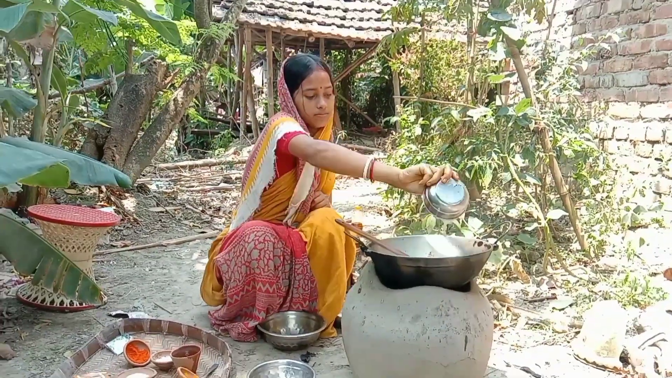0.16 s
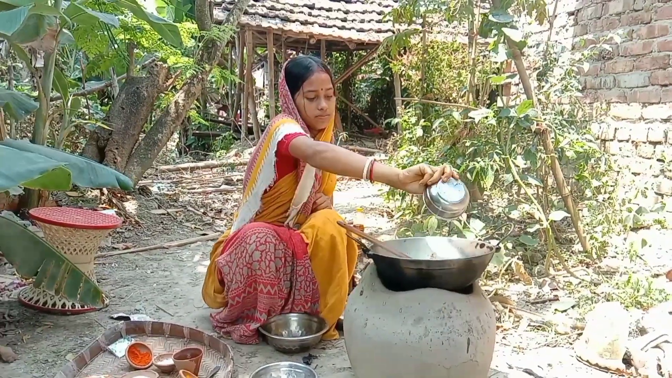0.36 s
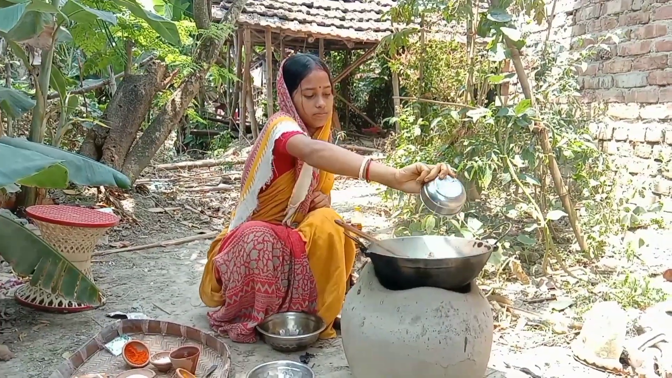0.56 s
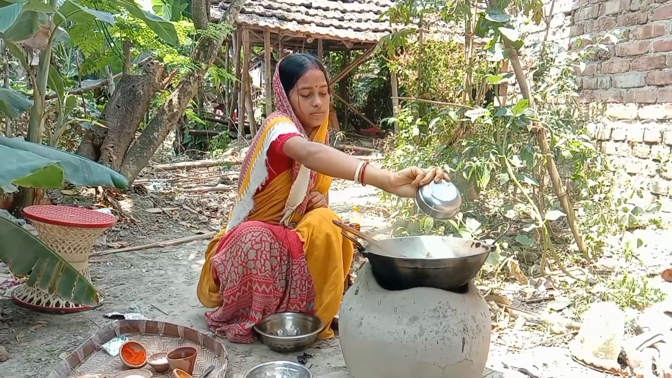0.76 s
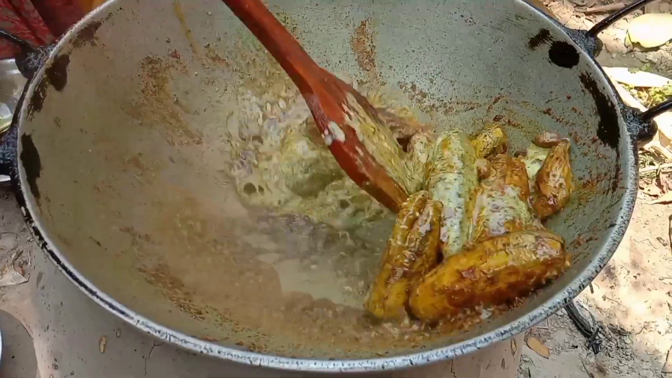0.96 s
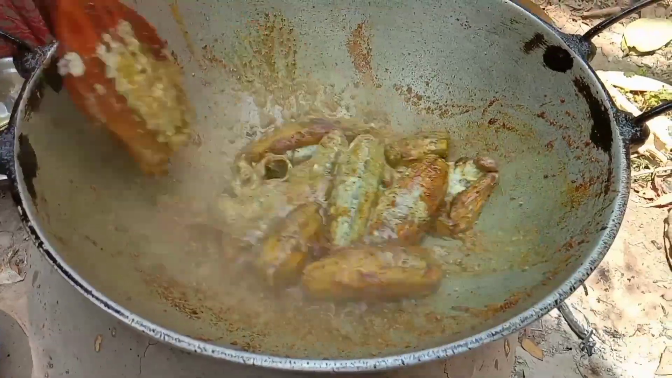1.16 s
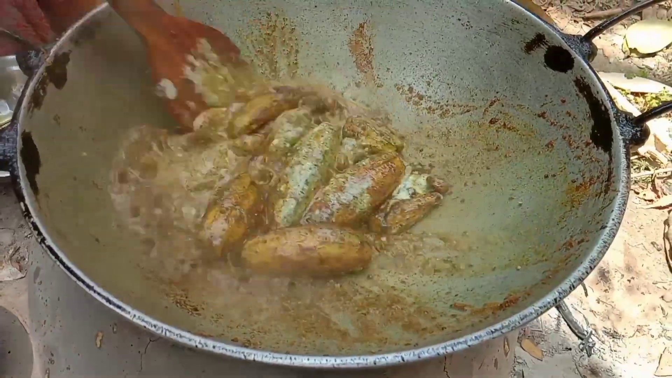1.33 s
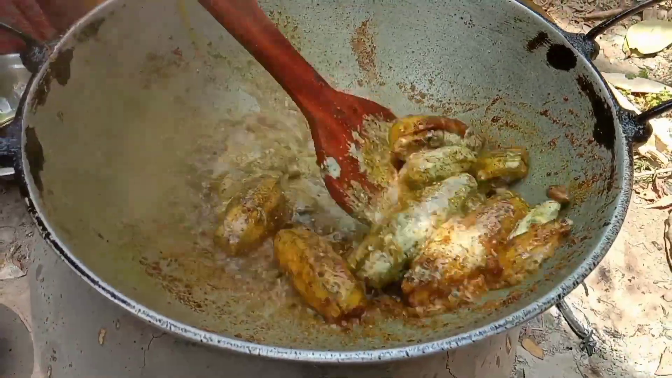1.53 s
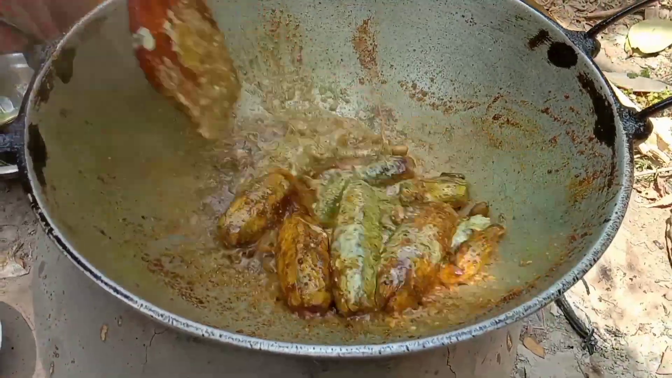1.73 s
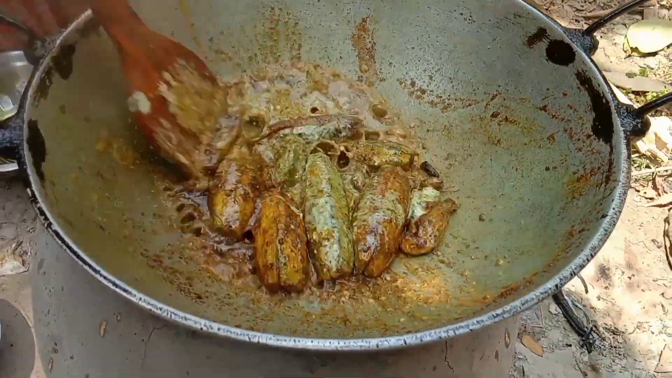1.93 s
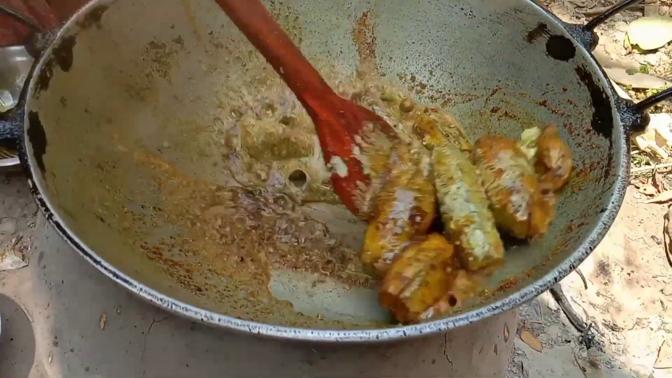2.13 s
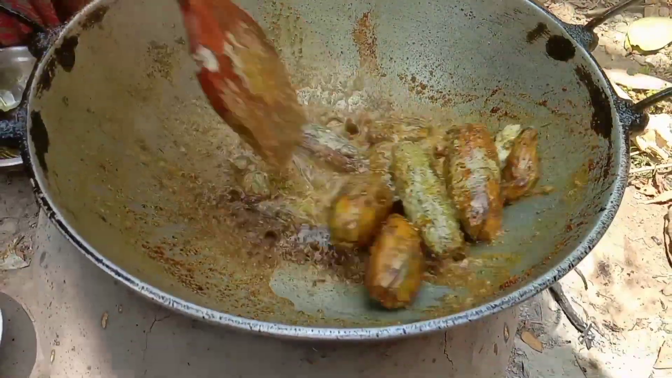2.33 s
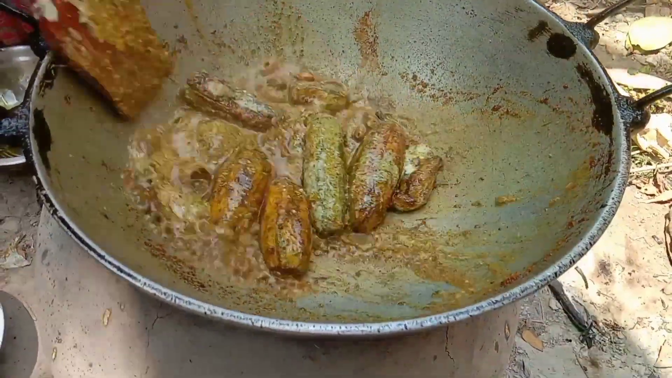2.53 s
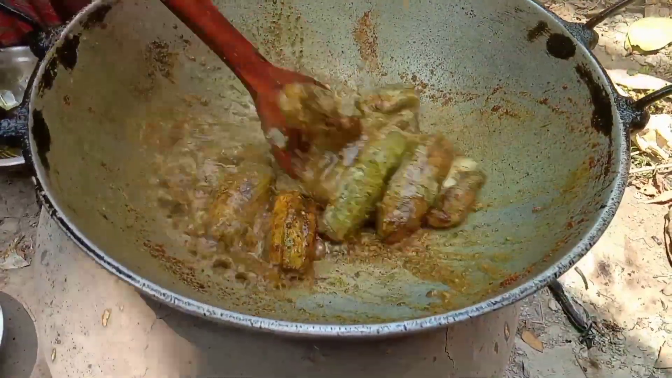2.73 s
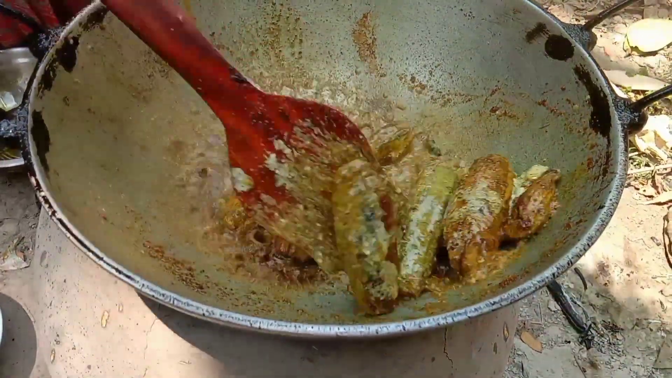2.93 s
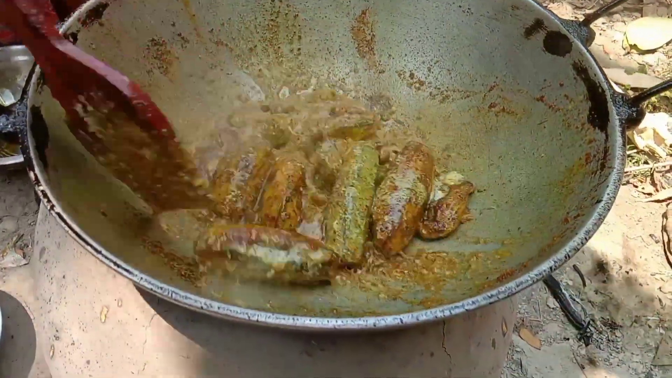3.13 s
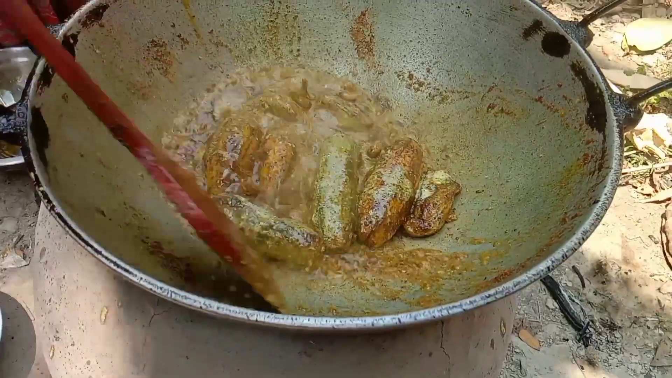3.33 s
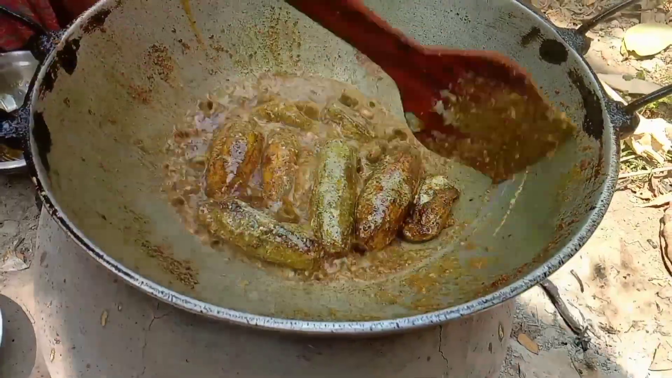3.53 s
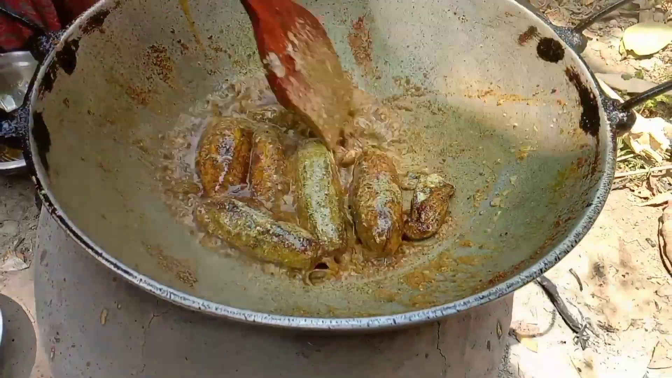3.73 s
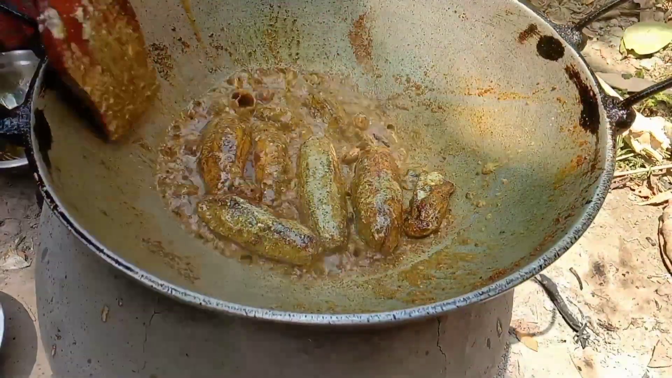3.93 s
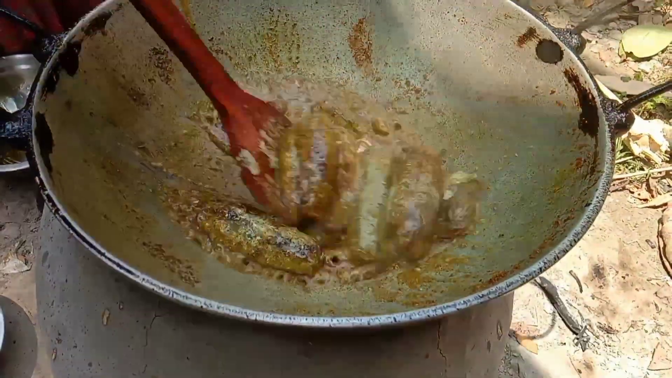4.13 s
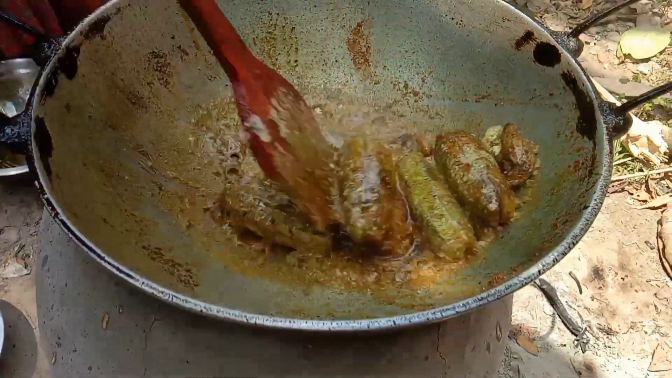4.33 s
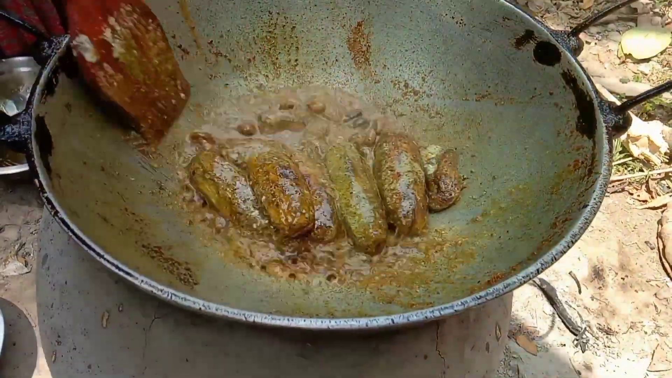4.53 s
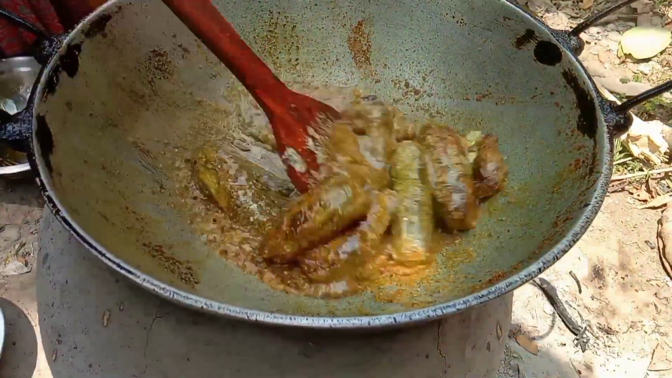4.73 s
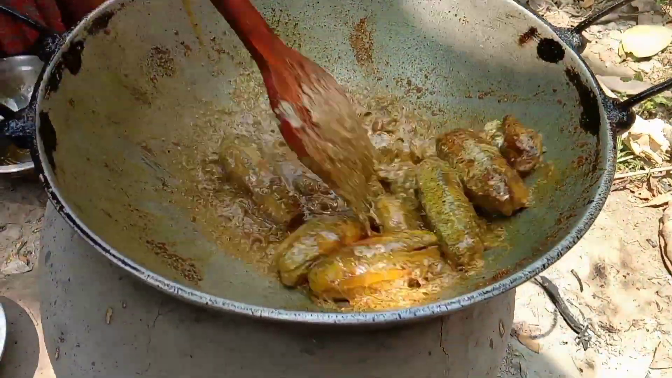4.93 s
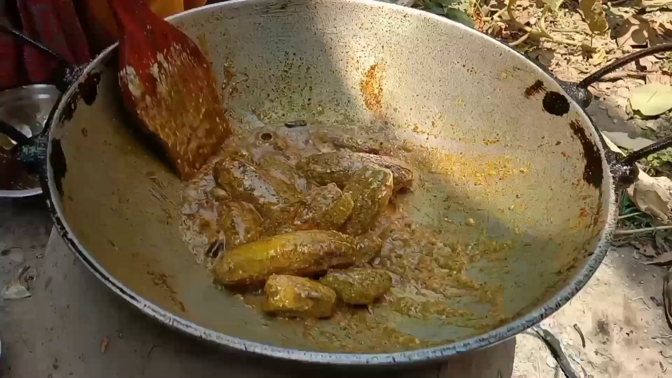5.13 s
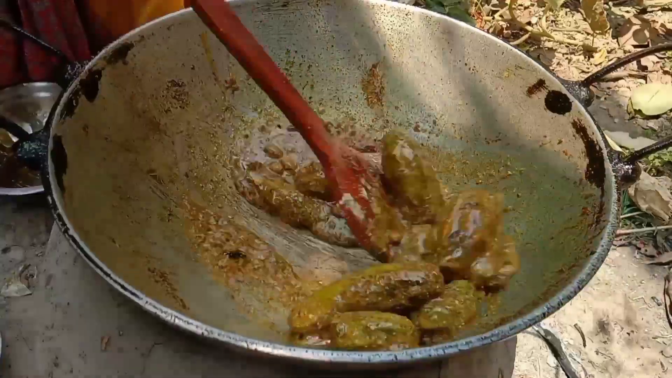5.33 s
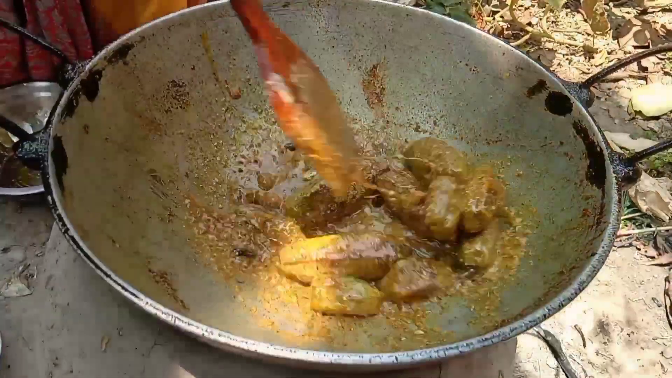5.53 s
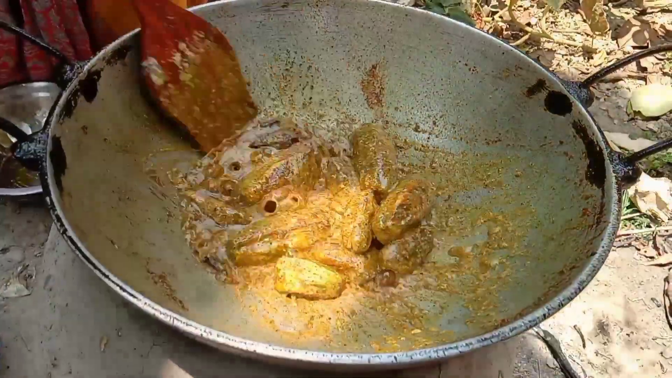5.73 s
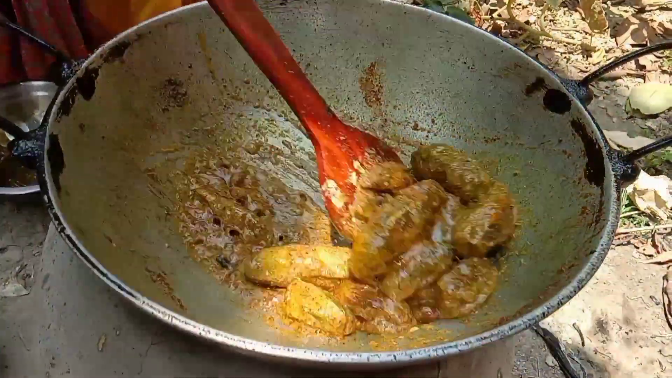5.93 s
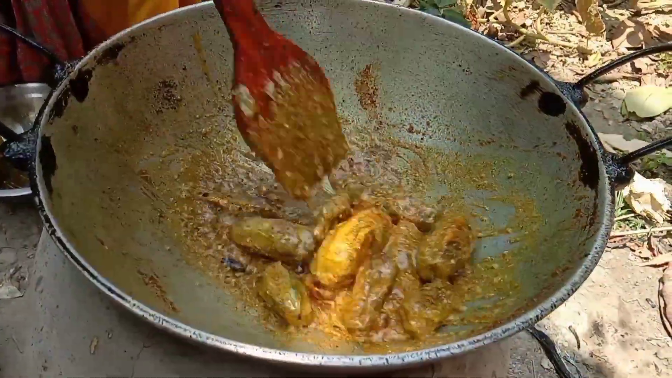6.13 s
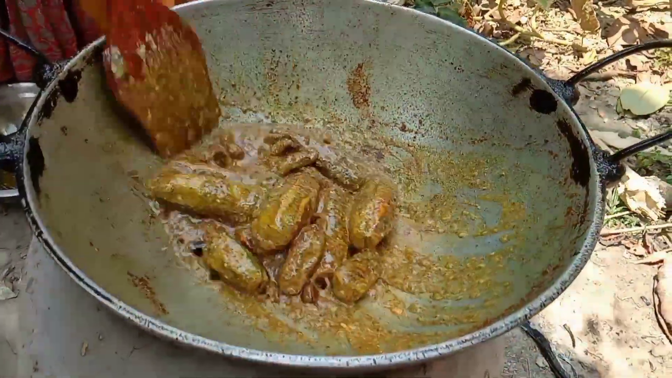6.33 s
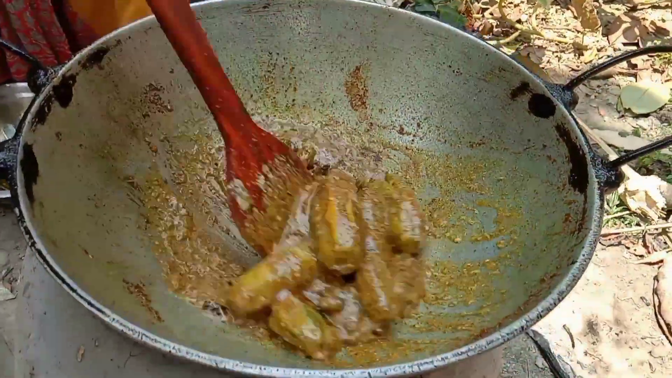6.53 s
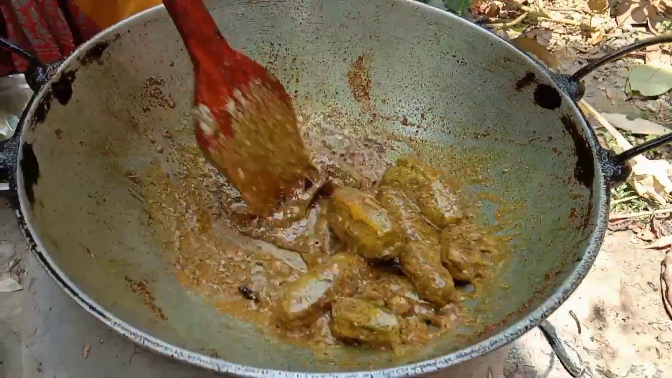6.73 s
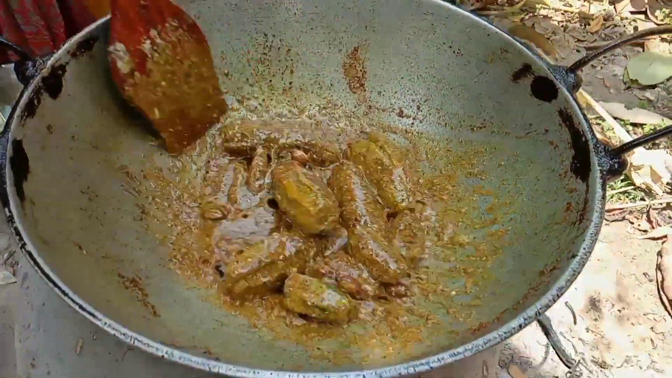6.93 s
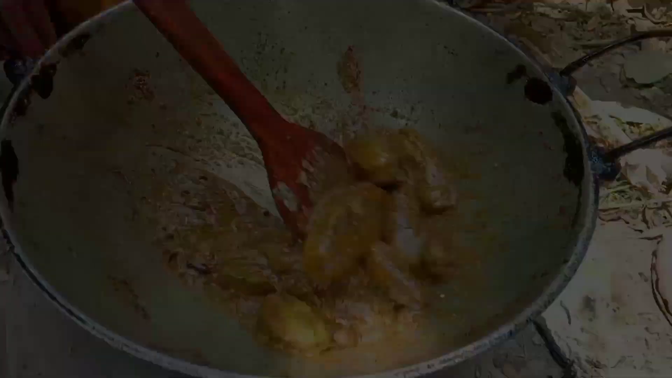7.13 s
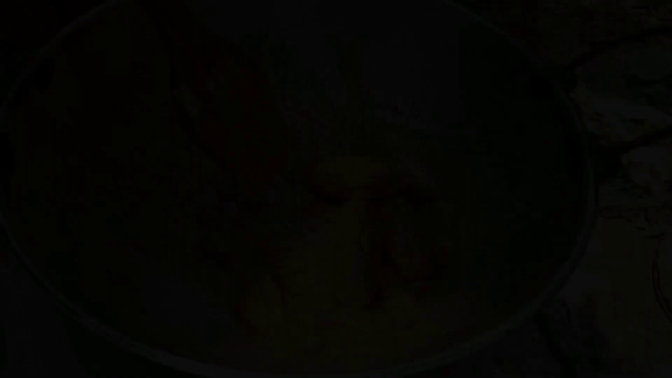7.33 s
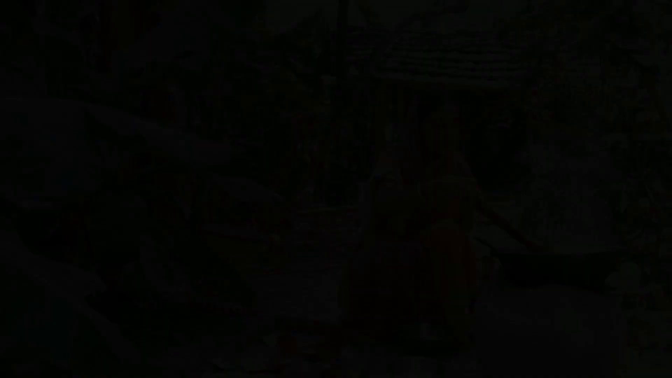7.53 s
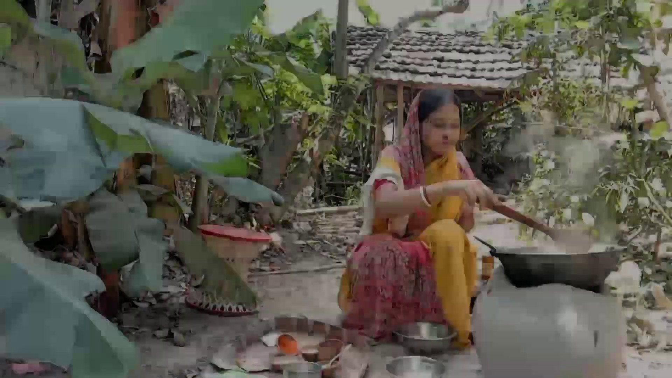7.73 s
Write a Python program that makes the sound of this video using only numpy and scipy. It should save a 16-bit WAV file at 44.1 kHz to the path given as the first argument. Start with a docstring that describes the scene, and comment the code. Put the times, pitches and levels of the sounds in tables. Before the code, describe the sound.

Wet paste sizzles loudly in hot oil in a wok, then slowly dies down while a wooden spatula knocks and scrapes.

```python
"""Wet paste fried in an iron wok on a clay stove outdoors, mono. Over the quiet oil a hollow call rises.
At 0.18 s the paste hits the oil: steam bubbles burst in a dense sizzle, heard from afar, with a low hum,
wind and two squeaks. From 1.1 s the sizzle is close by; it turns hollower and dies away over a simmer
while a wooden spatula knocks and scrapes. Oil pops three times around 6 s. At the end the hum swells
again and more squeaks sound."""
import sys
import numpy as np
from scipy import signal
from scipy.fft import rfft, irfft, next_fast_len
from scipy.io import wavfile
from scipy.ndimage import uniform_filter1d, map_coordinates

SR = 44100
rng = np.random.default_rng(int(sys.argv[2]) if len(sys.argv) > 2 else 0)


def persist_wave(psi):
    """Save psi, clipped to +-1, as 16-bit WAV."""
    counts = np.round(np.clip(psi, -1, 1) * 32767).astype(np.int16)
    wavfile.write(sys.argv[1], SR, np.atleast_2d(counts).T)


N = 342808
TIME_S = np.arange(N) / SR
POUR_S, BOIL_END_S = 0.176, 1.12


def amp(db):
    """dB to gain."""
    return 10 ** (np.asarray(db) / 20)


def unit(x):
    """x at rms 1."""
    return x / np.sqrt(np.mean(x ** 2) + 1e-20)


def curves(rows):
    """Per-sample curve of each column after the time."""
    times_s, *columns = np.transpose(rows)
    return [np.interp(TIME_S, times_s, column) for column in columns]


def wobble(rate_hz):
    """Smooth random curve, rate_hz knots a second."""
    knots = rng.standard_normal(int(N * rate_hz / SR) + 4)
    return map_coordinates(knots, [TIME_S * rate_hz])


def filtered(x, response):
    """x through a complex frequency response."""
    size = next_fast_len(N + SR // 4)
    return irfft(rfft(x, size) * response(np.fft.rfftfreq(size, 1 / SR)), size)[..., :N]


def causal(points):
    """Minimum-phase response through (frequency [Hz], gain [dB]): each pop rings after it bursts."""
    points_hz, points_db = np.transpose(points)

    def response(hz):
        db = np.interp(np.log(hz + 1), np.log(points_hz + 1), points_db)
        cepstrum = irfft(np.log(amp(np.maximum(db, -80))))
        cepstrum[1:len(hz) - 1] *= 2
        cepstrum[len(hz):] = 0
        return np.exp(rfft(cepstrum))
    return response


def resonance(hz, centre_hz, width_hz):
    """Response of one mode, 1 at its centre."""
    return 1j * hz * width_hz / (centre_hz ** 2 - hz ** 2 + 1j * hz * width_hz)


def spiky_noise(count, spread_db):
    """Noise with a random gain on each sample."""
    return rng.standard_normal(count) * amp(spread_db * np.clip(rng.standard_normal(count), -3, 3))


def bursts(response, spread_db, patchy_db, streak_db):
    """Countless bursting bubbles, rms 1: broad patches where oil spits, streaks where a pitch lingers."""
    x = spiky_noise(N, spread_db)
    for depth_db, window, bins, frames in ((patchy_db, 256, 5, 8), (streak_db, 1024, 2, 6)):
        spectra = signal.stft(x, nperseg=window)[2]
        field = uniform_filter1d(rng.standard_normal(spectra.shape), size=bins, axis=0)
        field = uniform_filter1d(field, size=frames, axis=1)
        x = signal.istft(spectra * amp(depth_db * unit(field)), nperseg=window)[1][:N]
    return unit(filtered(x, response))


def tone(hz, db, overtones, rough):
    """Gliding sine with overtones (multiple, gain [dB]), hoarse from amplitude and phase flutter."""
    phase = 2 * np.pi * np.cumsum(hz) / SR + rough * wobble(120)
    stack = np.sin(phase) + sum(amp(gain_db) * np.sin(k * phase) for k, gain_db in overtones)
    return np.sqrt(2) * amp(db) * (1 + 0.58 * rough * wobble(140)) * stack


def fry():
    """Close sizzle, swelling as the pieces are turned; spray, wok ring and wood rub follow its level."""
    # close sizzle (time [s], level [dB], finest spray re sizzle [dB])
    levels = [(1.17, -31, -9), (1.28, -32, -4), (1.46, -29, -6.5), (1.96, -28, -5), (2.05, -29.5, -8),
              (2.29, -29.5, -5), (2.55, -34, -6), (2.69, -34, -4), (2.79, -31, -6), (3.03, -32.5, -1),
              (3.23, -34.5, -5), (3.37, -33, -1), (4.02, -36, -4), (5.1, -37.5, -4), (5.36, -42, -6),
              (5.82, -43, -3), (5.93, -40.5, -7), (6.33, -43, -7), (7.05, -42, -3), (7.18, -45.5, -7),
              (7.77, -53, -8)]
    # sizzle spectra, oil spitting high and sunk into the bowl (frequency [Hz], density [dB])
    high_colour = [(1650, -36), (2800, -3.5), (3000, -5.5), (3870, 2.5), (4640, -3), (5380, 2),
                   (6200, -2.5), (7140, 2), (8060, -5.5), (8980, -3.5), (12600, -14), (13400, -14),
                   (14000, -15)]
    sunk_colour = [(1650, -28), (2800, -3.5), (3060, -6.5), (3890, 3.5), (4610, -10.5), (5030, -1),
                   (5490, 3), (6320, -3), (7330, 2), (7950, -5), (8860, -3), (11200, -12), (12400, -13),
                   (13400, -24), (14000, -35)]
    # sinking into the bowl (time [s], power share of the sunk colour [0-1])
    sinking = [(1.5, 0), (6, 1)]
    # spray at the microphone port's peak (frequency [Hz], density [dB])
    spray_colour = [(13300, -8.5), (14000, 6), (14600, 18), (15200, 21), (15600, 7.5)]
    # strongest wok modes (frequency [Hz], width [Hz], gain [dB])
    modes = [(613.4, 37, -15.5), (978, 68, -16.5), (1269, 103, 3), (1723, 250, -7.5)]
    # wood on iron (frequency [Hz], density [dB])
    rub_colour = [(820, -36), (1400, -3.5), (1500, -5.5), (1710, 0), (2010, -3.5), (2190, -1.5), (2980, -6),
                  (3200, -3.5), (4160, -20), (7040, -120)]

    def wok(hz):
        return sum(amp(db) * resonance(hz, centre, width) ** 2 for centre, width, db in modes)

    level_db, spray_db = curves(levels)
    sunk_share, = curves(sinking)
    change_db = level_db + 30  # re the loud sizzle at -30 dB
    flicker = wobble(30)
    high = bursts(causal(high_colour), spread_db=5, patchy_db=1, streak_db=1.46)
    sunk = bursts(causal(sunk_colour), spread_db=5, patchy_db=1, streak_db=1.46)
    sizzle = amp(level_db + 0.6 * flicker) * (np.sqrt(1 - sunk_share) * high + np.sqrt(sunk_share) * sunk)
    spray = amp(level_db + spray_db + 0.8 * flicker + 0.74 * wobble(45))
    spray *= bursts(causal(spray_colour), spread_db=6, patchy_db=1, streak_db=-1)
    ring = amp(-36.5 + 0.85 * change_db) * bursts(wok, spread_db=0, patchy_db=-1.2, streak_db=2)
    rub = amp(-35.5 + 1.086 * change_db + 0.7 * flicker + 0.51 * wobble(5))
    rub *= bursts(causal(rub_colour), spread_db=4, patchy_db=1.1, streak_db=3)
    return sizzle + spray + ring + rub


def boil_up():
    """The water in the paste boils off at once and rings the wok, heard from afar."""
    # far hiss (frequency [Hz], density [dB])
    colour = [(88, -77), (150, -24), (359, -22), (642, -15.5), (842, -13), (1260, -3), (1390, -9),
              (1510, -6.5), (2490, -1), (4810, -6), (7230, -6), (8120, -9), (10500, -7), (13400, -26.5),
              (15400, -5)]
    # wok modes and dips between them (frequency [Hz], width [Hz], gain re hiss [dB])
    modes = [(1293, 16, 7), (1524, 21, 10), (1674, 38, 8), (1988, 29, 6.5), (2505, 63, 4), (2900, 90, 1.5),
             (3053, 33, 6.5), (4430, 90, 0.5), (6220, 290, -17), (7180, 380, 3.5), (8100, 340, -8),
             (10200, 1200, -3)]

    def rung_hiss(hz):
        peaks = [1 + (amp(db) - 1) * resonance(hz, centre, width) for centre, width, db in modes]
        return causal(colour)(hz) * np.prod(peaks, axis=0)

    rise_db_per_s, fade_db_per_s = 4, 260
    level_db = -21 + rise_db_per_s * (TIME_S - POUR_S)
    level_db -= fade_db_per_s * np.maximum(TIME_S - BOIL_END_S, 0)
    envelope = (TIME_S >= POUR_S) * amp(level_db + 0.48 * wobble(23.8))
    return envelope * bursts(rung_hiss, spread_db=2.5, patchy_db=0.4, streak_db=1.97)


def knocks():
    """Spatula contacts: a dull, rough thud of the loaded wok and a short click of the iron."""
    # contacts (time [s], relative thud level [dB], thud pitch [Hz], click gain [dB])
    contacts = [(1.352, -35.5, 299, -37), (1.935, -36.5, 290, -52), (2.666, -32, 322, -51),
                (2.685, -25.5, 350, -39), (3.327, -36, 310, -42), (3.794, -43, 423, -52),
                (4.103, -36, 322, -43), (4.255, -43, 456, -53), (4.642, -43, 298, -49),
                (5.271, -39, 288, -42), (5.377, -43.5, 296, -40), (5.818, -36, 463, -31),
                (5.826, -32, 299, -37), (5.975, -36.5, 370, -43), (6.432, -38, 497, -32),
                (6.529, -43, 277, -52), (6.551, -46, 298, -51), (6.926, -40.5, 387, -54),
                (7.021, -37, 478, -30.5), (7.134, -49, 377, -42), (7.304, -41, 462, -50),
                (7.607, -37, 271, -39)]
    # iron click modes (frequency [Hz], gain [dB], t60 [s])
    modes = [(1070, -27, 0.09), (1900, 4.5, 0.014), (2540, 2.5, 0.021), (2690, -1, 0.035),
             (3680, -6, 0.016)]
    out, t = np.zeros(N + SR), np.arange(SR // 5) / SR
    puff_band = signal.butter(3, [260, 520], "band", fs=SR)
    for start_s, thud_db, thud_hz, click_db in contacts:
        puff = unit(signal.lfilter(*puff_band, rng.standard_normal(len(t))))
        thud = np.sin(2 * np.pi * thud_hz * t) * amp(-60 * t / 0.052)
        thud += 0.37 * puff * amp(-60 * t / 0.11)
        thud *= 1 - np.exp(-t / 0.005)
        click = np.zeros(len(t))
        for hz, db, t60_s in modes:
            decay = amp(db + rng.normal(0, 2.4) - 60 * t / t60_s)
            click += decay * np.sin(2 * np.pi * hz * rng.normal(1, 0.029) * t)
        click += 0.46 * np.diff(rng.standard_normal(len(t) + 1)) * amp(-60 * t / 0.0043)
        click *= 1 - np.exp(-t / 0.0003)
        out[round(start_s * SR):][:len(t)] += amp(thud_db + 5) * thud + amp(click_db) * click
    return out[:N]


def rasps():
    """Wood dragged over iron: a swell of rough noise around one resonance."""
    # rasps, mostly blade drags (start [s], length [s], centre [Hz], level [dB])
    drags = [(1.466, 0.077, 1900, -33), (2.123, 0.042, 1700, -38), (2.796, 0.13, 1670, -36.5),
             (3.316, 0.051, 950, -41), (4.248, 0.13, 1000, -50.5), (4.721, 0.066, 2200, -39.5),
             (5.063, .12, 2200, -49), (5.29, 0.048, 2580, -42), (5.838, 0.043, 2360, -46),
             (5.919, 0.093, 1750, -40), (6.428, 0.07, 1005, -47), (6.434, 0.047, 2400, -44),
             (7.044, .05, 990, -53), (7.05, 0.16, 1500, -46), (7.144, 0.067, 2020, -47),
             (7.62, 0.098, 480, -53.5), (7.675, .16, 2290, -48), (7.688, 0.078, 3280, -51),
             (7.696, 0.1, 1780, -45), (7.722, .12, 488, -49)]
    out, t = np.zeros(N + SR), np.arange(SR // 5) / SR
    for start_s, length_s, hz, db in drags:
        band = signal.butter(2, [hz * 0.932, hz * 1.084], "band", fs=SR)
        swell = np.sin(np.pi * np.clip(t / length_s, 0, 1))
        friction = unit(signal.lfilter(*band, spiky_noise(len(t), spread_db=5)))
        out[round(start_s * SR):][:len(t)] += amp(db) * swell * friction
    return out[:N]


def spits():
    """Single oil drops burst: short bright cracks."""
    # pops (time [s], impulse before the band-pass [dB])
    pops = [(5.7694, -20), (5.9424, -17), (6.5318, -11)]
    impulses = np.zeros(N)
    for start_s, db in pops:
        impulses[round(start_s * SR)] = amp(db)
    return signal.lfilter(*signal.butter(2, [1600, 9500], "band", fs=SR), impulses)


def simmer():
    """Large slow bubbles under the sizzle."""
    # bubble spectrum (frequency [Hz], density [dB])
    colour = [(76, -60), (130, -32), (194, -12), (414, -5.5), (506, -6), (602, -1.5), (736, -11), (958, -2),
              (1070, -8), (1150, -2), (1500, -45), (2530, -120)]
    # bubbling (time [s], level [dB])
    levels = [(1.15, -45.5), (2.3, -48), (2.6, -52), (4.3, -55.5), (5.1, -59), (7.2, -55.5), (7.77, -51.5)]
    envelope = amp(curves(levels)[0] + 0.69 * wobble(6))
    return envelope * bursts(causal(colour), spread_db=3.5, patchy_db=2, streak_db=4)


def squeaks():
    """Brief hoarse squeaks; the pitch holds, then slides late."""
    # squeaks (start [s], length [s], first pitch [Hz], last pitch [Hz], level [dB],
    # octave re fundamental [dB], roughness [0-1])
    events = [(.745, 0.088, 1670, 1640, -31.5, -30, .4), (1.073, 0.047, 2190, 2150, -22.5, -3, .8),
              (7.659, .075, 2375, 2330, -45, -30, .3), (7.677, 0.11, 1320, 1370, -42.5, -28, 0.5),
              (7.679, 0.062, 2650, 2600, -37, -30, .3), (7.728, .055, 2530, 1950, -42, -30, .8)]
    out, edge_s = np.zeros(N), 0.014
    for start_s, length_s, first_hz, last_hz, db, octave_db, rough in events:
        age_s = TIME_S - start_s
        hz = first_hz + (last_hz - first_hz) * np.clip(age_s / length_s, 0, 1) ** 3.2
        envelope = np.clip(np.minimum(age_s, length_s - age_s) / edge_s, 0, 1) ** 2
        out += envelope * tone(hz, db, [(2, octave_db)], rough)
    return out


def hollow_call():
    """A hollow rising call, perhaps a bird."""
    # call contour (time [s], pitch [Hz], level [dB])
    contour = [(0, 638, -54), (.05, 636, -52), (.08, 668, -44), (.1, 670, -33), (.115, 704, -46),
               (.14, 732, -41), (.17, 790, -46), (.18, 800, -70)]
    # overtones (multiple, gain [dB])
    overtones = [(2, -18), (4, -15), (5, -16), (6, -27)]
    sounding = (TIME_S >= contour[0][0]) & (TIME_S <= contour[-1][0])
    return sounding * tone(*curves(contour), overtones, rough=0.21)


def hum_and_wind():
    """Low hum, perhaps a far engine, in rumbling swells of sinking pitch over a faint wind."""
    # hum swells (start [s], length [s], first pitch [Hz], relative peak [dB])
    swells = [(0.049, 0.13, 88, -45), (.16, 0.16, 97, -30.5), (.33, 0.067, 92, -41), (.46, .16, 93, -33),
              (0.765, 0.19, 88, -33.5), (0.957, 0.21, 86, -37.5), (1.33, .1, 70, -60), (1.68, .1, 88, -63),
              (2.1, .8, 62, -67), (3.476, 0.39, 96, -53), (3.906, 0.4, 84, -53), (4.398, 0.48, 73, -59),
              (5.054, 0.34, 66, -73), (5.424, 0.24, 69, -58), (5.854, .53, 84, -55), (6.426, 0.21, 76, -56),
              (6.759, .55, 70, -60), (7.2, 0.2, 108, -55), (7.374, .12, 106, -44.5),
              (7.512, 0.15, 100, -42), (7.644, 0.2, 98, -38.5)]
    # wind rumble (frequency [Hz], density [dB])
    colour = [(15, -58), (25, -21), (32, -40), (67, -0.5), (86, 0), (102, -1), (124, -8), (150, -10.5),
              (200, -27), (330, -120)]
    sag_hz_per_s = 18
    envelope, hz = np.zeros(N), np.zeros(N)
    for start_s, length_s, first_hz, db in swells:
        age_s = TIME_S - start_s
        envelope += amp(db) * np.sin(np.pi * np.clip(age_s / length_s, 0, 1))
        hz[age_s >= 0] = first_hz - sag_hz_per_s * age_s[age_s >= 0]
    hum = np.sqrt(2) * np.sin(2 * np.pi * np.cumsum(hz * (1 + 0.034 * wobble(14))) / SR)
    rumble = unit(filtered(rng.standard_normal(N), causal(colour)))
    wind_db = np.where(TIME_S < BOIL_END_S, -55.5, -73)  # from afar, then close by
    return 0.55 * envelope * hum + (0.21 * envelope + amp(wind_db)) * rumble


def yard():
    """Quiet oil and yard before the paste goes in."""
    # ambience (frequency [Hz], density [dB])
    colour = [(76, -49), (130, -15), (516, -16.5), (669, -4.5), (785, -23), (939, -25), (1270, -17),
              (1460, -19.5), (2990, -15), (4830, -19), (10300, -19.5), (12900, -37), (15400, -21)]
    ambience = bursts(causal(colour), spread_db=2.5, patchy_db=2, streak_db=-3)
    return (TIME_S < POUR_S) * amp(-40.5) * ambience


def scene():
    """All sources at one microphone, on two equal channels."""
    far = yard() + boil_up()
    fade_in = np.interp(TIME_S, [1.11, 1.16], [0, 1])
    close = fade_in * (fry() + simmer()) + knocks() + rasps() + spits()
    return np.tile(far + close + hum_and_wind() + hollow_call() + squeaks(), (2, 1))


def record(dry):
    """Band limit: nothing passes above 15520 Hz."""
    return filtered(dry, lambda hz: hz < 15520)


dry = scene()
out = record(dry)
persist_wave(out)
```